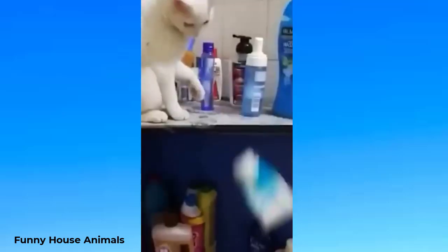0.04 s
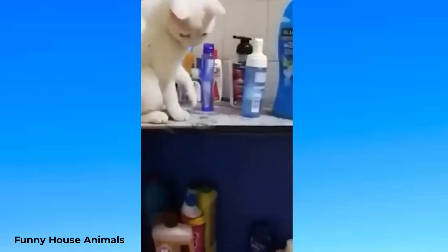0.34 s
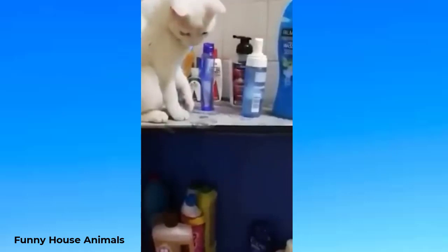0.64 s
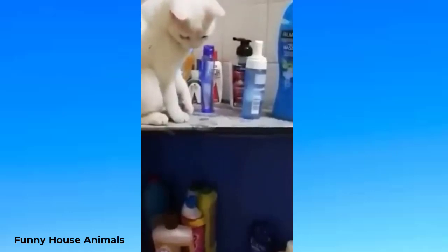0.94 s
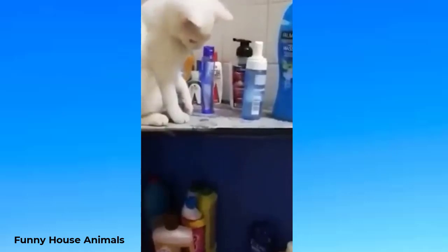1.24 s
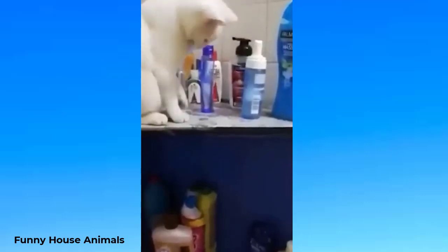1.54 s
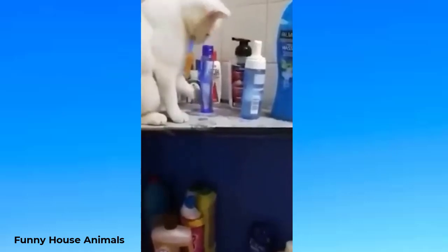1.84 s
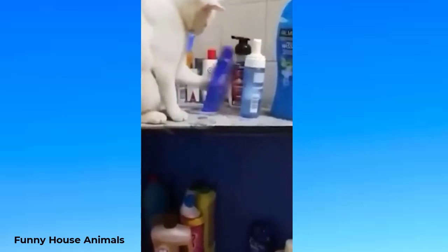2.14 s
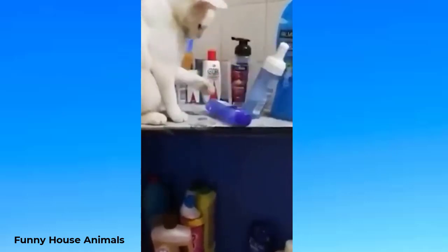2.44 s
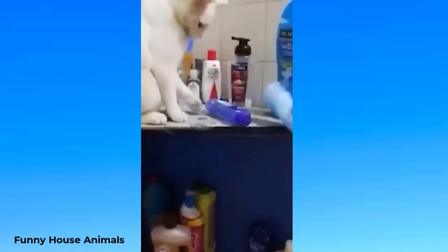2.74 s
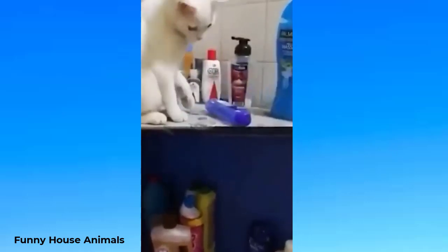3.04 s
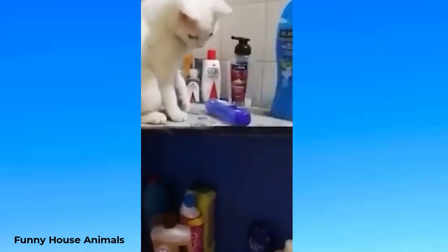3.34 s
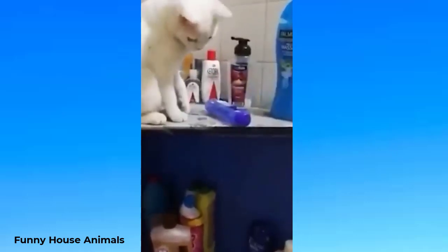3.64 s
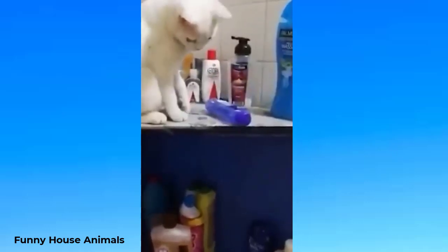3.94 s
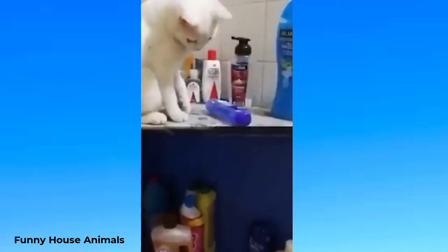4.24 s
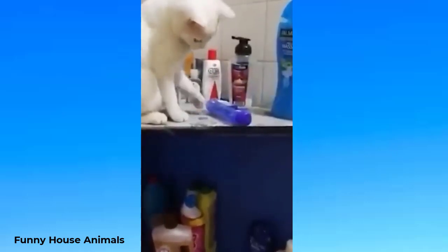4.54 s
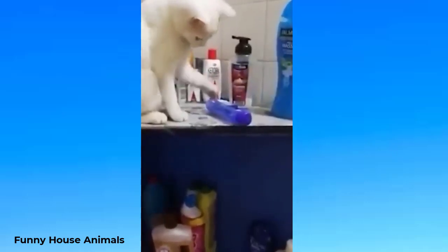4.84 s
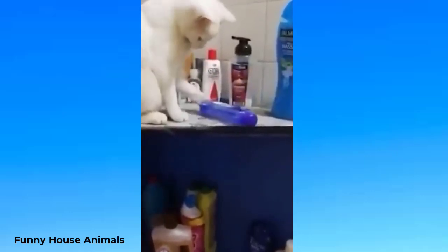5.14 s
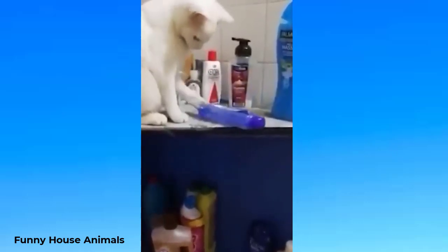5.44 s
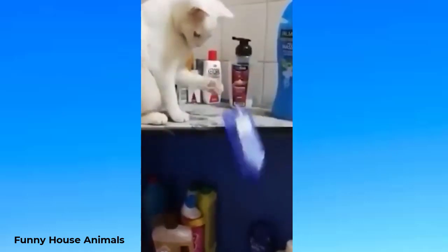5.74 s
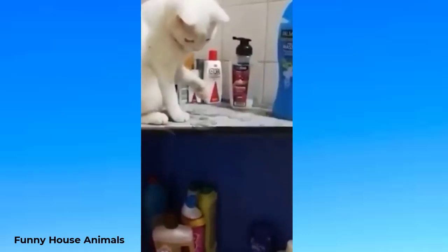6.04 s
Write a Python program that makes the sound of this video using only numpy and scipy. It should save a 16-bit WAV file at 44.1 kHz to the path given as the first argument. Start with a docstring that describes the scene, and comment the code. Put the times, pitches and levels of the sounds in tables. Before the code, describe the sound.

Plastic bottles thump over on a hollow shelf and clatter onto the floor of a small tiled bathroom, followed by faint brushing.

```python
"""Plastic clacks, booms and clatters in a small tiled bathroom: a cat bats bottles about on a shelf.
A tube drops to the floor and bounces with a hollow note. Two bottles topple onto the shelf and set
the cupboard booming; one falls and clatters on the tiles, the other is pushed along, brushing faintly.
The hand-held phone adds soft bumps over rumble and hiss; its right microphone is muffled."""
import sys
import numpy as np
from scipy import signal
from scipy.fft import rfft, irfft, next_fast_len
from scipy.io import wavfile
from scipy.ndimage import map_coordinates

SR = 44100
rng = np.random.default_rng(int(sys.argv[2]) if len(sys.argv) > 2 else 0)


def bounce(signal):
    """Save signal as a 16-bit WAV file at the path given by the first command-line argument."""
    frames = np.transpose(np.atleast_2d(signal))
    limited = np.clip(frames, -1, 1)
    pcm = np.round(limited * 32767).astype(np.int16)
    wavfile.write(sys.argv[1], SR, pcm)


N = 268128
T = np.arange(SR) / SR  # seconds since a contact

# Hand bumps. Each row: start in seconds, envelope peak in dB, frequency in Hz, cycles to the peak.
HAND_BUMPS = [(0.875, -46, 275, 0.91), (1.069, -31.5, 188, 0.47), (1.694, -42.5, 159.4, 0.37),
              (2.975, -25, 201, 0.37), (4.090, -45, 148.2, 0.25), (5.155, -31.5, 110, 0.61),
              (5.702, -44.5, 143, 0.21), (6.016, -43, 202, 0.39)]
# Grazes on the shelf. Each row: start in seconds, level in dB, band centre in Hz.
SHELF_SCUFFS = [(1.051, -64, 2620), (2.745, -63, 4403), (4.750, -55.5, 1388), (5.49, -55, 625),
                (5.552, -56.5, 576), (5.623, -63, 898), (5.99, -52.5, 2130)]
# A bottle slides or tips. Each row: start in seconds, length in seconds, level at full speed in dB.
SHELF_SLIDES = [(2.049, 0.25, -54), (2.452, 0.036, -50.5), (2.82, 0.065, -41.5), (5.11, 0.3, -56.5),
                (5.3, 0.22, -56), (5.46, 0.16, -59.5), (5.67, 0.2, -57), (5.805, 0.12, -52.5)]
# Knocks on the shelf. Each row: start in seconds, boom in dB, its centre in Hz, board ring in dB,
# its centre in Hz, thump in dB, bottle ring in dB, click in dB, click T60 in seconds.
SHELF_KNOCKS = [(-0.002, -27.5, 179.2, -49.5, 410, -46, -51.5, -48.5, 0.069),
                (2.3477, -36.5, 95, -31, 320.5, -43, -30, -36, 0.0077),
                (2.378, -43.5, 100, -44, 330, -50.5, -37.5, -47, 0.029),
                (2.4858, -15.5, 150.2, -17, 397, -23.5, -31, -39.5, 0.059),
                (2.534, -31, 215, -31.5, 370, -36.5, -49, -50, 0.027),
                (2.849, -24, 126.1, -35, 440, -38, -47.5, -44.5, 0.027)]
# The tube hits the floor; the faint row at 0.416 s is the landing's echo off the tiles.
# Each row: start in seconds, clack in dB, treble tilt in dB per octave, hollow note in dB,
# its centre in Hz, wall ring in dB.
TUBE_HITS_AND_ECHO = [(0.3600, -23.5, -4, -22, 900, -40), (0.3828, -15, -1.5, -7, 880, -37),
                      (0.4160, -32, -1, -17, 830, -40), (0.5507, -39.5, -2.5, -36.5, 800, -29),
                      (0.5579, -23, -5.5, -18, 760, -17.5)]
# The bottle rattles between bounces. Each row: start in seconds, length in seconds, ticks in dB,
# treble tilt in dB per octave, body ring in dB.
BOTTLE_SKITTERS = [(3.288, 0.034, -25, -1, -40), (3.416, 0.055, -32, -4.5, -40),
                   (3.485, 0.029, -30, -4.5, -36.5), (3.524, 0.04, -31.5, 7.5, -45)]
# The bottle hits the floor. Each row: start in seconds, clack in dB, treble tilt in dB per octave,
# body ring in dB, wall ring in dB.
BOTTLE_HITS = [(3.2617, -17.5, 1, -29.5, -40.5), (3.268, -12, 1.5, -35, -25),
               (3.2750, -19, 0.5, -42.5, -25), (3.285, -30.5, 0.5, -33.5, -22),
               (3.3067, -26, -2.5, -43, -31), (3.428, -37.5, -6.5, -44.5, -45),
               (3.48, -27, 10.5, -36, -38.5), (3.533, -37.5, 5, -47, -52)]

# Resonances. Each row: frequency in Hz, relative level in dB, T60 in seconds.
TUBE_HOLLOW_MODES = [(414.6, -7, 0.12), (689, -18, .35), (716, -13, .38), (740, -9, .4), (794, -7, .43),
                     (818, -6, .45), (855, -4, .42), (888, -4, .36), (912, -5, .3), (865, 7, .028)]  # includes the room's standing waves around the tube's note
TUBE_WALL_MODES = [(1350, -8, 0.025), (1500, -3.5, 0.057), (1620, 4, 0.03), (1700, -4.5, 0.025),
                   (1784, 3.5, 0.028), (2060, -12.5, 0.031), (3280, -20, 0.0053), (3970, -13.5, .012),
                   (4412, -20, 0.012)]
BOTTLE_BODY_MODES = [(295, -1, 0.015), (354, -5.5, 0.031), (422, -6, 0.048), (505, -6.5, 0.064),
                     (632, -3, 0.05), (827, -1, 0.028), (880, -6.5, .035), (1110, -12, 0.014),
                     (1460, -13.5, 0.0088), (2050, -14, 0.012)]
BOTTLE_WALL_MODES = [(920, -3.5, 0.073), (1083, 0, 0.11), (1384, 1.5, .08), (1530, -5, .07),
                     (1886, 3.5, .12), (2005, 2, 0.072), (2420, -0.5, 0.06), (2870, -1.5, .06),
                     (3300, -1.5, .05), (4100, 8.5, 0.1), (4380, 0, 0.068), (6000, -3.5, .05)]
BOARD_MODES = [(288.4, -2.5, .38), (334.3, 1.5, 0.18), (403, -1.5, .3), (431, -4.5, 0.27), (447, -3, 0.28),
               (500, -7, 0.19), (555, -8.5, 0.22), (618, -10, 0.2), (810, -6, 0.2), (1061, -3, 0.2),
               (1228, 3, 0.25)]
CUPBOARD_MODES = [(62, -15, 0.3), (80, -9, 0.55), (99.2, -3.5, 0.75), (124, -6, 0.28), (186.2, -2.5, 0.48),
                  (199.8, 5, 0.29), (243, -7.5, 0.63)]

# Noise spectra. Each row: frequency in Hz, relative spectral density in dB.
BACKGROUND_SPECTRUM = [(12, -34), (20, 3), (88, -3.5), (174, -18), (249, -19), (345, -23.5), (648, -29.5),
                       (1090, -27), (1320, -29), (1990, -31), (2410, -32.5), (3850, -33), (10600, -36),
                       (12800, -44.5), (13900, -64)]
BRUSH_SPECTRUM = [(300, -7), (1000, -11), (2500, 1.5), (4500, 7), (8200, 10.5), (11000, 3.5), (14000, -3)]
THUMP_SPECTRUM = [(25, -43.5), (60, -19.5), (110, -7), (160, -10), (300, 0.5), (450, -3), (700, -11),
                  (1500, -20), (4000, -32.5)]
CLICK_SPECTRUM = [(100, -7.5), (500, -1), (1500, 0.5), (3000, -0.5), (4500, 0), (9500, -4), (12500, -13),
                  (14000, -10.5)]
TUBE_CLACK_SPECTRUM = [(40, -41), (130, -26), (300, -10.5), (500, 0), (750, 5), (1100, -2), (2200, -0.5),
                       (4200, 1.5), (6000, -3), (9800, -4), (10900, -11.5), (14000, -18.5)]
BOTTLE_CLACK_SPECTRUM = [(40, -38.5), (200, -19), (320, -10.5), (520, -3.5), (800, 1), (2200, 0.5),
                         (4200, 1.5), (6000, -2.5), (9300, -2.5), (11000, -9), (12700, -18.5), (14000, -26)]

# Stereo likeness. Each row: frequency in Hz, left-right correlation.
BACKGROUND_CORRELATION = [(80, 1), (200, 0.3), (520, -0.41), (1400, 0.26), (4500, 0.45)]
TILE_CORRELATION = [(150, 0.85), (450, 1), (1200, 0.18), (2500, 0.06), (6000, 0.038)]
# Background balance. Each row: frequency in Hz, left minus right in dB.
BACKGROUND_BALANCE_DB = [(60, 1), (180, -4), (520, 1.5), (1550, 1.5), (4570, 0), (13500, 0)]
# Room decay. Each row: frequency in Hz, T60 in seconds.
TILE_T60_S = [(100, 0.82), (400, 0.44), (900, 0.45), (2000, .42), (5000, 0.36), (12000, 0.46)]
# Muffling of the right port. Each row: frequency in Hz, gain in dB.
MUFFLE_GAIN_DB = [(130, 1), (250, 0), (450, -3), (850, -8), (1500, -6.5), (3000, -9.5), (5200, -20.5),
                  (6200, -23.5), (8500, -25.5), (10500, -36), (12500, -43)]
# Further lag of the right port. Each row: frequency in Hz, phase lag in radians.
MUFFLE_LAG_RAD = [(60, -0.3), (130, -0.25), (200, 0.17), (290, 0.25), (360, 0.68), (620, 0.8), (820, 1.65),
                  (1500, 0.7)]


def amp(db):
    """Decibels to gain."""
    return 10 ** (np.asarray(db) / 20)


def unit_rms(x):
    """Scale to rms 1."""
    return x / np.sqrt(np.mean(x ** 2) + 1e-20)


def unit_blow(x):
    """Scale to the energy of 10 ms at rms 1."""
    return x / np.linalg.norm(x) * np.sqrt(SR / 100)


def decay(t, t60_s):
    """Exponential fall, 60 dB in t60_s."""
    return 1000. ** (-t / np.maximum(t60_s, 1e-3))


def attack(rise_s):
    """Exponential rise to 1."""
    return 1 - np.exp(-T / rise_s)


def wobble(knots):
    """Smooth random curve, read at positions counted in knots."""
    return map_coordinates(rng.standard_normal(1024), [knots], mode="wrap")


def curve(points, hz):
    """Interpolate (Hz, value) points on a log axis."""
    point_hz, values = np.transpose(points)
    return np.interp(np.log(hz + 1), np.log(point_hz + 1), values)


def tilted(spectrum, tilt_db_oct, corner_hz=1500):
    """Response of a contact; its hardness tilts the treble above the corner."""
    return lambda hz: amp(curve(spectrum, hz) + tilt_db_oct * np.log2(1 + hz / corner_hz))


def filtered(x, response):
    """Apply a frequency response."""
    n = x.shape[-1]
    padded = next_fast_len(n + SR // 4)
    return irfft(rfft(x, padded) * response(np.fft.rfftfreq(padded, 1 / SR)), padded)[..., :n]


def add(track, start_s, sound):
    """Mix a sound in at start_s."""
    start = round(start_s * SR)
    first, last = max(start, 0), min(start + sound.shape[-1], N)
    track[..., first:last] += sound[..., first - start:last - start]


def stereo_noise(correlation, size):
    """Two noises whose correlation depends on frequency."""
    def mid_side_gains(hz):
        angle_rad = np.arccos(np.clip(curve(correlation, hz), -1, 1)) / 2
        return np.array([np.cos(angle_rad), np.sin(angle_rad)])
    mid, side = filtered(rng.standard_normal((2, size)), mid_side_gains)
    return np.array([mid + side, mid - side])


def burst(colour, t60_s, rise_s, ripple_db=2, spacing_hz=90):
    """Dense, heavily damped modes of uneven strength: fast-dying coloured noise."""
    rippled = lambda hz: colour(hz) * amp(ripple_db * wobble(hz / spacing_hz))
    noise = filtered(rng.standard_normal(SR), rippled)
    return unit_blow(noise * decay(T, t60_s) * attack(rise_s))


def clack(spectrum, tilt_db_oct, t60_s):
    """The sound of hard plastic on the tiles."""
    return burst(tilted(spectrum, tilt_db_oct), t60_s, rise_s=0.0003, ripple_db=1.33, spacing_hz=110.5)


def ring(modes, corner_hz, rise_s=0.00093, scatter_db=1.5, detune=0.003):
    """Damped modes of alternating sign, varied per blow; soft contacts weaken those above the corner."""
    partials = np.zeros(SR)
    for k, (hz, db, t60_s) in enumerate(modes):
        level_draw, pitch_draw = rng.standard_normal(2)
        gain = (-1) ** k * amp(db + scatter_db * level_draw) / np.hypot(1, (hz / corner_hz) ** 2)
        partials += gain * np.cos(2 * np.pi * hz * (1 + detune * pitch_draw) * T) * decay(T, t60_s)
    return unit_blow(partials * attack(rise_s))


def resound(modes, centre_hz, falloff_db_oct, rise_s, scatter_db=1.2):
    """Large resonances start together and beat; the place of the blow favours those near centre_hz."""
    partials = np.zeros(SR)
    for hz, db, t60_s in modes:
        octaves_off = np.abs(np.log2(hz / centre_hz))
        gain = amp(db + scatter_db * rng.standard_normal() - falloff_db_oct * octaves_off)
        partials += gain * np.sin(2 * np.pi * hz * T) * decay(T, t60_s)
    return unit_blow(partials * attack(rise_s))


def bathroom(x, wet_db, build_s=0.00047):
    """Direct sound plus the tiles' fast-building stereo reverberation."""
    hz, t, bins = signal.stft(stereo_noise(TILE_CORRELATION, SR), SR, nperseg=256)
    bins *= decay(t, curve(TILE_T60_S, hz)[:, None])
    tail = signal.istft(bins, SR, nperseg=256)[1][:SR, :SR] * attack(build_s)
    wet = signal.fftconvolve(x[None], tail, axes=1)[:, :len(x)]
    return x + amp(wet_db) * wet * np.linalg.norm(x) / np.linalg.norm(wet[0])


def background(level_db=-57, swell_db=2, swell_per_s=12, waver_db=1.82, waver_per_s=8):
    """Faint, wavering hiss over an unsteady low rumble."""
    sides_db = lambda hz: np.outer([.5, -.5], curve(BACKGROUND_BALANCE_DB, hz))
    colour = lambda hz: amp(curve(BACKGROUND_SPECTRUM, hz) + sides_db(hz))
    noise = unit_rms(filtered(stereo_noise(BACKGROUND_CORRELATION, N), colour))
    rumble = filtered(noise, lambda hz: 1 / (1 + (hz / 300) ** 4))
    hiss = noise - rumble
    t = np.arange(N) / SR
    swell = amp(swell_db * wobble(t * swell_per_s))
    waver = amp(waver_db * wobble(t * waver_per_s))
    return amp(level_db) * (hiss * waver + rumble * swell)


def hand_bumps():
    """Each touch rocks the phone for a cycle or two, alike in both ports."""
    out = np.zeros(N)
    for start_s, db, hz, cycles_to_peak in HAND_BUMPS:
        age = T * hz / cycles_to_peak
        envelope = (age * np.exp(1 - age)) ** 2
        add(out, start_s, amp(db) * envelope * np.sin(2 * np.pi * hz * T))
    return out


def shelf_scuffs(q=1.17):
    """Paw and plastic graze the shelf: short, soft rubs, each in its own band."""
    out = np.zeros((2, N))
    for start_s, db, centre_hz in SHELF_SCUFFS:
        band = lambda hz: 1 / (1 + (q * (hz / centre_hz - centre_hz / (hz + 1))) ** 2)
        rub = amp(db) * burst(band, t60_s=0.071, rise_s=0.018)
        add(out, start_s, bathroom(rub, wet_db=1.0))
    return out


def shelf_slides(peak_skew=1.8, speed_power=0.66, grip_db=1.34, grip_per_s=70):
    """A pushed bottle speeds up and slows; its brushing follows the speed and the uneven grip."""
    out = np.zeros((2, N))
    for start_s, length_s, db in SHELF_SLIDES:
        speed = np.abs(np.sin(np.pi * np.clip(T / length_s, 0, 1) ** peak_skew))
        gain = amp(db + grip_db * wobble(T * grip_per_s)) * speed ** speed_power
        brush = unit_rms(filtered(rng.standard_normal(SR), lambda hz: amp(curve(BRUSH_SPECTRUM, hz))))
        add(out, start_s, bathroom(gain * brush, wet_db=-6.5))
    return out


def shelf_knocks():
    """Toppling bottles click, ring, shake the shelf board and set the cupboard under it booming."""
    out = np.zeros((2, N))
    click_colour = lambda hz: amp(curve(CLICK_SPECTRUM, hz))
    for (start_s, boom_db, boom_hz, board_db, board_hz,
         thump_db, bottle_db, click_db, click_t60_s) in SHELF_KNOCKS:
        boom = amp(boom_db) * resound(CUPBOARD_MODES, boom_hz, falloff_db_oct=8.5, rise_s=0.011)
        board = amp(board_db) * resound(BOARD_MODES, board_hz, falloff_db_oct=13.5, rise_s=0.0027)
        thump_colour = lambda hz: amp(curve(THUMP_SPECTRUM, hz)) / np.hypot(1, hz / board_hz)
        thump = amp(thump_db) * burst(thump_colour, t60_s=0.06, rise_s=0.001, ripple_db=1)
        bottle = amp(bottle_db) * ring(BOTTLE_BODY_MODES, corner_hz=4068)
        click = amp(click_db) * burst(click_colour, click_t60_s, rise_s=0.0011, ripple_db=1.5)
        add(out, start_s, boom + bathroom(board, wet_db=-11.5))
        add(out, start_s, bathroom(thump + bottle, wet_db=0.5) + bathroom(click, wet_db=1.0))
    return out


def tube_drop():
    """The tube lands, echoes off the tiles and bounces: clack, wall ring and a lingering hollow note."""
    out = np.zeros((2, N))
    for start_s, clack_db, tilt_db_oct, hollow_db, centre_hz, wall_db in TUBE_HITS_AND_ECHO:
        snap = amp(clack_db) * clack(TUBE_CLACK_SPECTRUM, tilt_db_oct, t60_s=0.026)
        hollow = amp(hollow_db) * resound(TUBE_HOLLOW_MODES, centre_hz, falloff_db_oct=15, rise_s=0.0008)
        wall = amp(wall_db) * ring(TUBE_WALL_MODES, corner_hz=8038)
        add(out, start_s, bathroom(snap, wet_db=2.5, build_s=0.004))
        add(out, start_s, bathroom(hollow, wet_db=-12.5) + bathroom(wall, wet_db=-2.5))
    return out


def bottle_skitters(taps_per_s=260, scatter_db=3.5, max_taps=64):
    """The bottle rattles over the floor in runs of light, uneven contacts that ring its body."""
    out = np.zeros((2, N))
    for start_s, length_s, ticks_db, tilt_db_oct, body_db in BOTTLE_SKITTERS:
        tap_s = (np.arange(max_taps) + rng.random(max_taps)) / taps_per_s
        gains = amp(scatter_db * rng.standard_normal(max_taps))
        in_run = tap_s < length_s
        taps = np.bincount((tap_s[in_run] * SR).astype(int), weights=gains[in_run], minlength=SR)
        envelope = signal.fftconvolve(taps, decay(T, t60_s=0.015))[:SR]
        ticks = filtered(envelope * rng.standard_normal(SR), tilted(BOTTLE_CLACK_SPECTRUM, tilt_db_oct))
        body = signal.fftconvolve(taps, ring(BOTTLE_BODY_MODES, corner_hz=380))[:SR]
        rattle = amp(ticks_db) * unit_blow(ticks) + amp(body_db) * unit_blow(body)
        add(out, start_s, bathroom(rattle, wet_db=-6.0))
    return out


def bottle_crashes():
    """The stiff bottle lands end over end: bright clacks with a brief ring of body and wall."""
    out = np.zeros((2, N))
    for start_s, clack_db, tilt_db_oct, body_db, wall_db in BOTTLE_HITS:
        body = amp(body_db) * ring(BOTTLE_BODY_MODES, corner_hz=430)
        wall = amp(wall_db) * ring(BOTTLE_WALL_MODES, corner_hz=8870)
        contact = amp(clack_db) * clack(BOTTLE_CLACK_SPECTRUM, tilt_db_oct, t60_s=0.033)
        add(out, start_s, bathroom(contact + body + wall, wet_db=-2.0, build_s=0.0019))
    return out


def muffled_port(x, delay_s=0.00054, smear_hz=1700, smear_rad=1.6, spacing_hz=450):
    """The right port hears late and dull, its phase scattered above smear_hz."""
    def response(hz):
        treble = 1 - 1 / np.hypot(1, (hz / smear_hz) ** 4)
        scatter_rad = smear_rad * wobble(hz / spacing_hz) * treble
        lag_rad = 2 * np.pi * hz * delay_s + curve(MUFFLE_LAG_RAD, hz) + scatter_rad
        return amp(curve(MUFFLE_GAIN_DB, hz)) * np.exp(-1j * lag_rad)
    return filtered(x, response)


def scene():
    """Floor and shelf sounds, clear on the left and muffled on the right, over bumps and background."""
    floor = tube_drop() + bottle_crashes() + bottle_skitters()
    left, right = floor + shelf_knocks() + shelf_slides() + shelf_scuffs()
    return np.array([left, muffled_port(right)]) + hand_bumps() + background()


def record(dry):
    """The phone rounds off the highest peaks and cuts everything above its band limit."""
    ceiling, top_hz = 0.95, 13050
    rounded = dry / (1 + (dry / ceiling) ** 6) ** (1 / 6)
    return filtered(rounded, lambda hz: 1 / np.hypot(1, (hz / top_hz) ** 70))


dry = scene()
out = record(dry)
bounce(out)
```